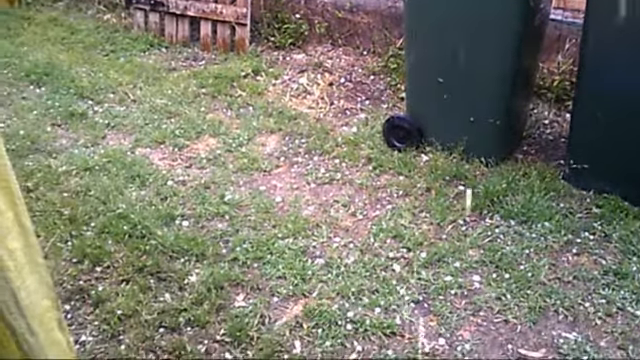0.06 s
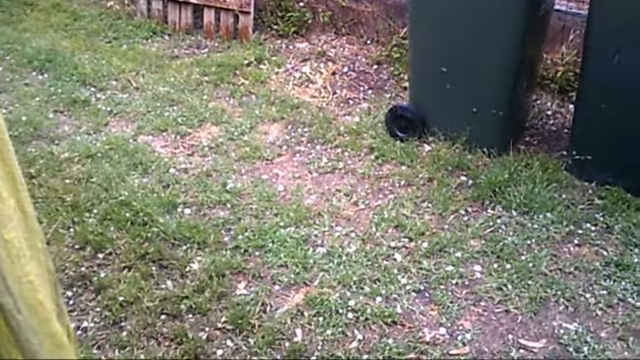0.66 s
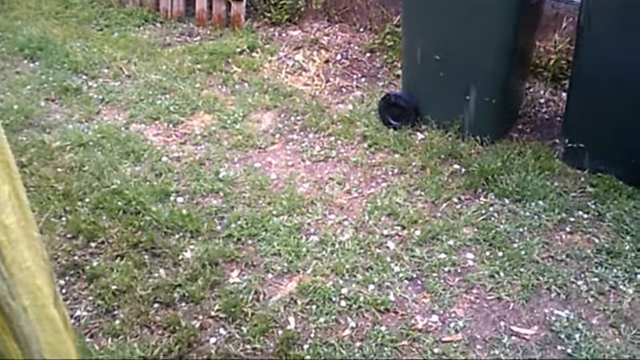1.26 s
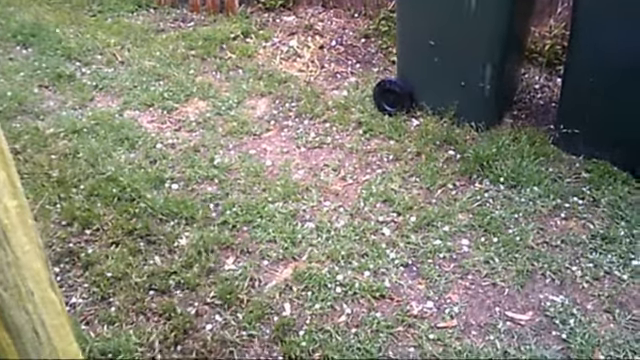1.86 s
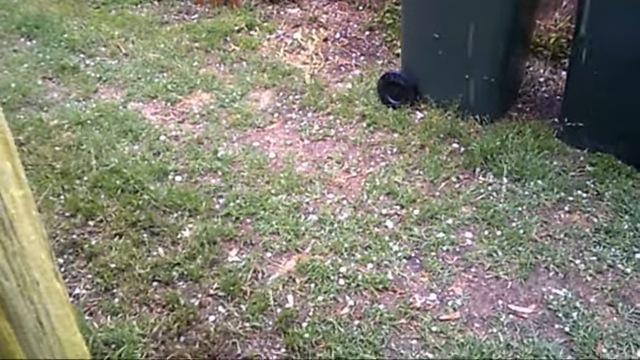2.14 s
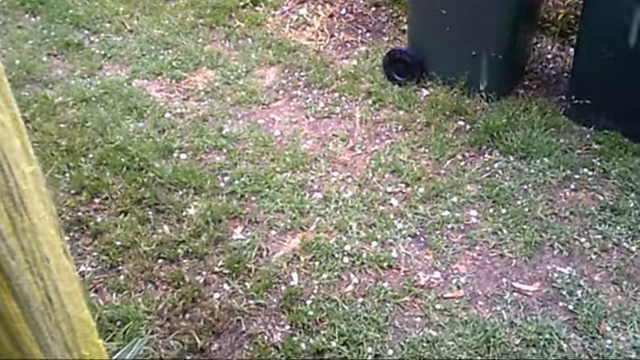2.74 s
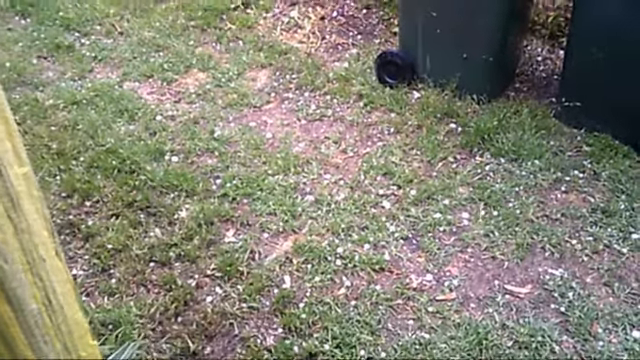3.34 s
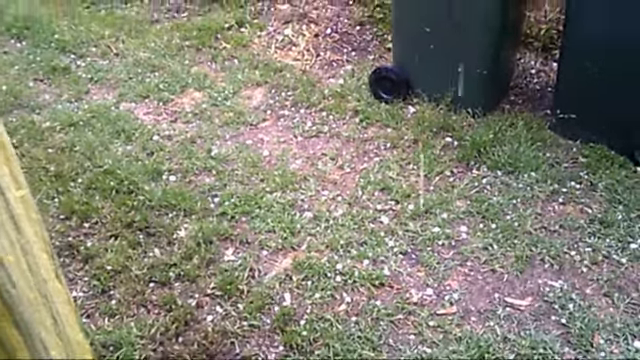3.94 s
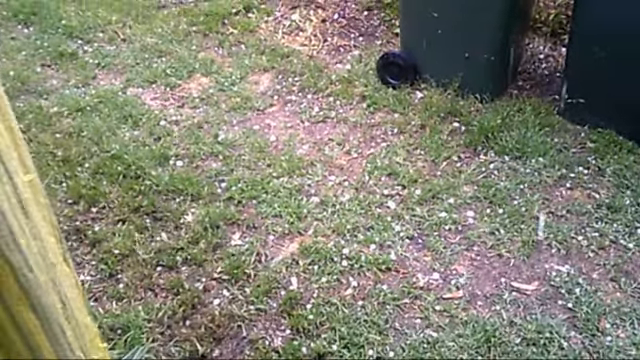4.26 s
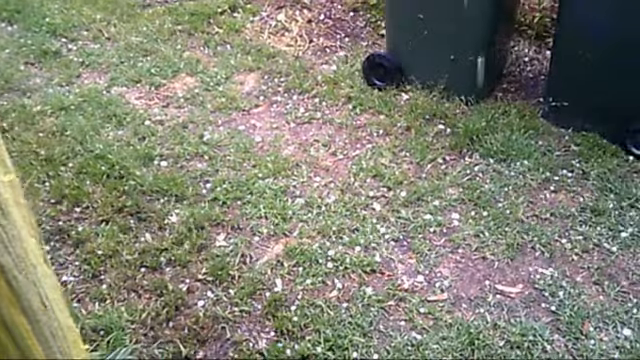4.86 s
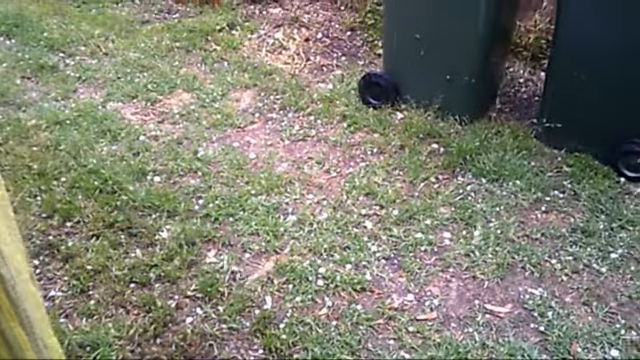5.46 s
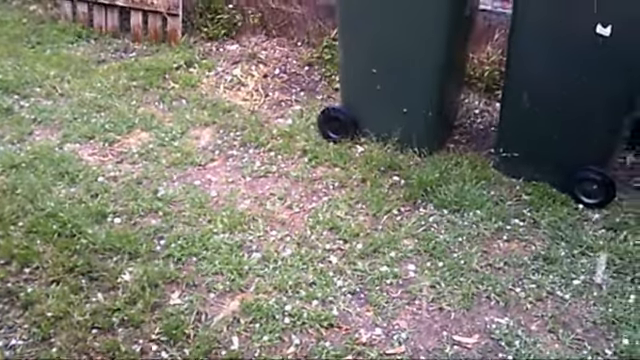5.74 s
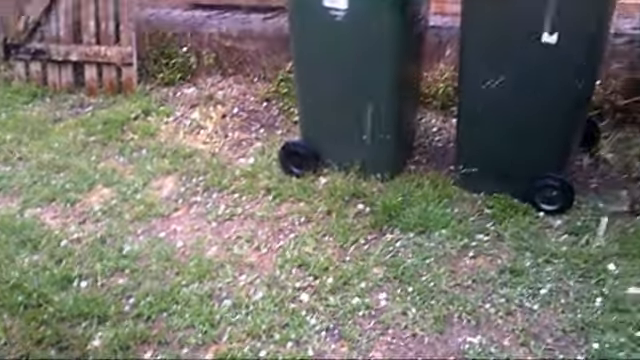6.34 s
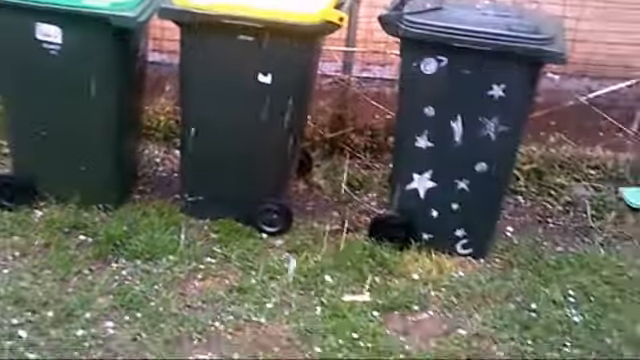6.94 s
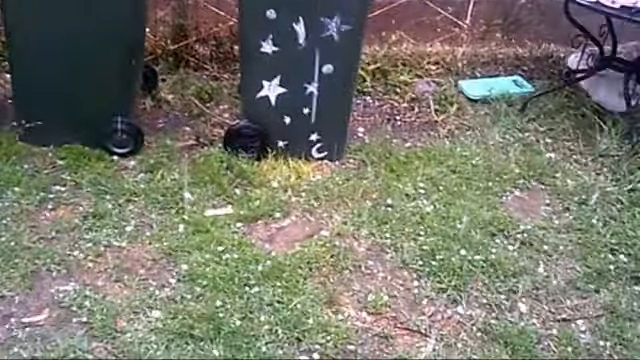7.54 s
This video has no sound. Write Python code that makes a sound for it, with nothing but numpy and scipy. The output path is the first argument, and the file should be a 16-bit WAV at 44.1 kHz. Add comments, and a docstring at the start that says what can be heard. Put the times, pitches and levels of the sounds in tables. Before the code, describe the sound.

From shelter at the edge of a back yard, countless small hailstones merge into a continuous clatter on the sheet roof overhead. Larger ones strike irregularly with hollow, booming knocks, and two hard ones land together at the end. Occasional short pings and dull bumps mix in, with faint ticks of ice on grass and bins and a low wind rumble. There is little treble.

```python
"""A dense patter of hail on a sheet roof over a back yard, heard from under its edge.
Hundreds of small impacts a second excite the bending modes of the sheets and merge, while ice ticks on
the lawn and the bins. Now and then a big stone knocks: a crack, then a boom and a rumble of the frame.
A few stones ping on something resonant, and there are some dull bumps. A low rumble of air lies under
it all, and little treble is kept."""
import sys
import numpy as np
from scipy import signal
from scipy.fft import rfft, irfft
from scipy.io import wavfile
from scipy.ndimage import uniform_filter1d, minimum_filter1d

SR = 44100
rng = np.random.default_rng(int(sys.argv[2]) if len(sys.argv) > 2 else 0)


def transcribe(u):
    """Save the signal u as a 16-bit wav file named by the first command-line argument.

    u: samples, shape (n,) or (channels, n), limited to [-1, 1]; the rate is SR.
    q: integer samples, one column per channel.
    """
    v = np.clip(np.atleast_2d(u).T, -1, 1)
    q = np.round(v * 32767).astype(np.int16)
    wavfile.write(sys.argv[1], SR, q)


N = 335160

# spectrum of big and middling stones on the roof: (frequency [Hz], relative spectral level [dB])
KNOCK_SPECTRUM = [(50, -17.5), (110, -3), (190, 1), (330, -0.5), (700, 0.5), (1100, 2), (1500, -3.5),
                  (2000, -1), (2600, -8.5), (3300, -14.5), (4300, -34.5), (5500, -43.5), (7200, -38),
                  (9000, -49.5)]


def undb(db):
    """Amplitude ratio of a level in decibels."""
    return 10 ** (np.asarray(db) / 20)


def level(x, db):
    """Normalisation to an rms level."""
    return x * undb(db) / np.sqrt(np.mean(x ** 2))


def read(table, hz):
    """Interpolation of a (frequency [Hz], value) table on a logarithmic frequency axis."""
    f, value = np.transpose(table)
    return np.interp(np.log(hz + 1), np.log(f), value)


def response(table, size, resonances=()):
    """Minimum-phase filter of mean power 1: the given spectrum with a peak at each resonance."""
    hz = np.arange(size // 2 + 1) * SR / size
    peaks_db = sum(lift / (1 + (2 * (hz - f) / width) ** 2) for f, width, lift in resonances)
    magnitude = level(undb(read(table, hz) + peaks_db), 0)
    cepstrum = irfft(np.log(magnitude), size)[:size // 2]
    return np.exp(2 * rfft(cepstrum, size) - cepstrum[0])


def coloured(table, size):
    """White noise filtered to the given spectrum, with rms near 1."""
    return irfft(rfft(rng.standard_normal(size)) * response(table, size), size)


def add(out, s, x):
    """Superposition of x on out from time s on."""
    i = max(int(s * SR), 0)
    out[i:i + len(x)] += x[:max(len(out) - i, 0)]


def arrivals(per_s, spread_db, top_db):
    """Poisson process of impacts, with log-normal strengths up to a largest one."""
    size_db = spread_db * rng.standard_normal(N)
    return (rng.random(N) < per_s / SR) * undb(np.minimum(size_db, top_db))


def shower():
    """Slow amplitude modulation: the hail eases off and picks up again."""
    # strength of the shower: (time [s], relative level [dB])
    strength = [(0.0, -21), (0.8, -25.5), (3.6, -26), (4.55, -23), (5.2, -24.5), (6.55, -23.5), (6.8, -25),
                (7.1, -22.5), (7.6, -24.5)]
    s, db = np.transpose(strength)
    return np.interp(np.arange(N) / SR, s, undb(db))


def roof(spectrum, bloom_s, flex_hz=380, body_hz=600, hard_hz=2800, size=24576):
    """Plate vibration: crowded modes act as noise bands, each with its own decay. Returns strike()."""
    # resonances of the sheets: (frequency [Hz], width [Hz], lift [dB])
    resonances = [(123, 28, 2.5), (165, 22, 2), (396.5, 9.7, 4), (542, 86, 1.5), (612, 8.5, 6.5),
                  (850, 52, 1), (1023, 58, 3), (1144, 70, 2), (1666, 28, 6), (1816, 100, 3)]
    # ring of the roof before a blow scales it: (frequency [Hz], 60 dB decay time [s])
    ring_times = [(60, 0.43), (170, 0.9), (420, 0.46), (1100, 0.3), (2000, 0.32), (3500, 0.2), (7500, 0.19)]
    t, hz = np.arange(size) / SR, np.arange(size // 2 + 1) * SR / size
    centres = np.geomspace(60, 7680, 12)
    bands = np.array([read(np.c_[centres, pick], hz) for pick in np.eye(len(centres))])
    f, sheet = centres[:, None], response(spectrum, size, resonances)
    low, high = 1 / (1 + (f / flex_hz) ** 3), 1 / (1 + (hard_hz / f) ** 4)
    middle = np.exp(-np.log2(f / body_hz) ** 2)
    # slow bending waves need time to spread over the sheet, so the boom comes late
    swell = 1 - np.exp(-t / (0.00023 + bloom_s * low))
    attack = swell * (1 + .5 * np.exp(-t / 0.001))  # the direct crack stands above the first ring
    log_decay = -np.log(1000) * t / read(ring_times, f)

    def strike(ring_scale, boom_db, body_db, hard_db):
        """Impulse response: one blow, with its own ring length, low boom, hollow body and hard treble."""
        phases = np.exp(2j * np.pi * rng.random(len(hz)))
        modes = irfft(bands * phases, size) * np.sqrt(size)
        gain = undb(boom_db * low + body_db * middle + hard_db * high)
        envelope = attack * np.exp(log_decay / max(ring_scale, .1))
        return irfft(rfft((gain * modes * envelope).sum(0)) * sheet, size)
    return strike


def patter(spots=14):
    """Linear superposition: small stones all over the roof, each spot with its own impulse response."""
    # spectrum of small stones on the roof: (frequency [Hz], relative spectral level [dB])
    patter_spectrum = [(40, -29), (70, -9.5), (120, 2), (200, 0.5), (330, -1), (450, -3.5), (700, -7),
                       (1000, 0), (1400, -4), (2000, -6.5), (2600, -13.5), (3400, -23), (4500, -49.5),
                       (7000, -48), (9000, -61)]
    out, force, strike = 0, shower(), roof(patter_spectrum, bloom_s=0.003)
    for boom, hard in rng.standard_normal((spots, 2)):
        spot = strike(ring_scale=0.56, boom_db=1.3 * boom, body_db=3, hard_db=2 * hard)
        stones = force * arrivals(per_s=360 / spots, spread_db=3.0, top_db=8.5)
        out = out + signal.oaconvolve(stones, spot)[:N]
    return level(out, db=-23)


def air():
    """Stationary noise: wind and far hail merge into a low rumble."""
    # spectrum of wind and far hail: (frequency [Hz], relative spectral level [dB])
    air_spectrum = [(20, -11), (36, -1), (55, -7.5), (85, -2), (150, -3), (400, -11.5), (1000, -9.5),
                    (2200, -14), (4500, -65), (7000, -58), (9000, -62.5), (15000, -48)]
    return level(coloured(air_spectrum, N), db=-30)


def ticks(spots=10, median_flight_s=0.055, rebound_db=-3.5, size=2048):
    """Inelastic impact: ice lands on lawn, path and bins in a splash of crumbs and rebounds once."""
    # spectrum of ice on the ground: (frequency [Hz], relative spectral level [dB])
    tick_spectrum = [(200, -4.5), (1000, 11.5), (2200, -7), (3300, -12), (4600, -29.5), (7000, -22.5),
                     (9000, -35)]
    out, t = 0, np.arange(size) / SR
    for spread, spring in rng.standard_normal((spots, 2)):
        decay_s = 0.003 * np.exp(.5 * spread)
        crumbs = rng.standard_normal(size) * np.exp(-t / decay_s)
        splash = irfft(rfft(crumbs) * response(tick_spectrum, size), size)
        stones = shower() * arrivals(per_s=65 / spots, spread_db=6.5, top_db=11)
        add(stones, median_flight_s * np.exp(.5 * spring), undb(rebound_db) * stones)
        out = out + signal.oaconvolve(stones, splash)[:N]
    return level(out, db=-45.5)


def knocks(ring_doubling_db=45.5, frame_db=-23.5, frame_rise_s=0.057, size=24576):
    """Impulsive excitation: a big stone cracks at the contact, the sheet rings, the frame rumbles on."""
    # big stones on the roof: (time [s], strength [dB], boom [dB], hardness [dB])
    big_stones = [(0.053, -14, -9.5, -11), (0.074, -11.5, -33, -15), (0.239, -14.5, -12, -9),
                  (0.341, -22, -14, -2), (0.542, -20, -5, -12), (0.759, -12, -10, 0.5),
                  (0.923, -10, -4, -9.5), (1.09, -7, 2.5, -7.5), (1.263, -14.5, -3, -1),
                  (1.282, -15, -6, -3), (1.563, -13, -10, -12.5), (1.969, -27, -4, 5),
                  (2.134, -16.5, 3.5, -13), (2.311, -17, 0, -16), (2.527, -17.5, -2, -16),
                  (2.906, -20, -1, -10), (3.096, -18, -9, -8), (3.447, -19.5, 3, -9), (3.673, -15, -4, -21),
                  (3.819, -18, 4, -6), (3.918, -15.5, -8, -17), (4.116, -16, 0.5, -2),
                  (4.148, -14.5, -0.5, -4.5), (4.346, -15, 1, -15), (4.414, -14.5, -3, -20),
                  (4.547, -15, -3, -8), (4.656, -2.5, 3.5, -7.5), (4.981, -10, -4.5, -1.5),
                  (5.15, -15, -5, -7), (5.302, -22, 5, -2), (5.387, -16.5, -8, -11), (5.655, -16.5, 5, -12),
                  (5.845, -16.5, 5, -8), (6.08, -16.5, 1, -12), (6.241, -14, 2.5, -5),
                  (6.264, -16.5, -17, -7), (6.484, -14.5, -3, -5.5), (6.641, -16, -21, -8),
                  (6.966, -15.5, 4, -13), (7.064, -19.5, -5, 1), (7.44, -5, 0.5, -3), (7.495, -5, 1, -10.5)]
    # spectrum of the frame under the sheets: (frequency [Hz], relative spectral level [dB])
    frame_spectrum = [(15, -11), (35, -1.5), (75, -2), (150, -7), (260, -2), (600, -43.5), (3000, -100)]
    out, t = np.zeros(N), np.arange(size) / SR
    strike = roof(KNOCK_SPECTRUM, bloom_s=0.0086)
    shake = (1 - np.exp(-t / frame_rise_s)) * (1 - t / t[-1]) ** 1.2
    for s, db, boom_db, hard_db in big_stones:
        # a heavier stone sets more of the sheet ringing, and for longer
        body_db = 1.5 + 0.49 * db
        ring_scale = 2 ** (db / ring_doubling_db)
        add(out, s, strike(ring_scale, boom_db, body_db, hard_db) * undb(db))
        add(out, s, coloured(frame_spectrum, size) * shake * undb(frame_db + db + boom_db))
    return out


def strays(count=20, strength_db=-22.5, spread_db=2.5):
    """Middling stones at scattered times: each point of impact excites a different mix of modes."""
    out, strike = np.zeros(N), roof(KNOCK_SPECTRUM, bloom_s=0.011)
    times = (np.arange(count) + rng.random(count)) / count * N / SR
    for s, (weight, boom, hard) in zip(times, rng.uniform(-1, 1, (count, 3))):
        blow = strike(ring_scale=0.53, boom_db=-4 + 5 * boom, body_db=0.5, hard_db=-3 + 5 * hard)
        add(out, s, blow * undb(strength_db + spread_db * weight))
    return out


def pings(rise_s=0.003):
    """Free vibration: one lightly damped mode decays exponentially after the blow."""
    # stones on something resonant: (time [s], frequency [Hz], level [dB], 60 dB decay time [s])
    ringing_hits = [(0.926, 1640, -15, 0.17), (1.091, 785, -16, 0.29), (1.565, 1860, -23, 0.39),
                    (4.412, 920, -27, 0.053), (4.432, 1028, -15, 0.12), (4.982, 1760, -24, 0.21),
                    (6.184, 2550, -33, 0.18), (6.243, 1696, -16, 0.15), (7.165, 1480, -22, 0.61)]
    out, t = np.zeros(N), np.arange(SR // 2) / SR
    for s, hz, db, t60 in ringing_hits:
        envelope = undb(db - 60 * t / t60) * (1 - np.exp(-t / rise_s))
        add(out, s, envelope * np.sin(2 * np.pi * hz * t))
    return out


def bumps():
    """Gaussian wave packets: a low tone of a few cycles at most is heard as a dull bump."""
    # low bumps: (centre time [s], frequency [Hz], peak level [dB], half-width at 1/e [s])
    packets = [(3.146, 164, -10, 0.0031), (4.555, 129, -14.5, 0.021), (5.307, 147, -14, 0.0059),
               (6.107, 86.5, -18, 0.022)]
    out, t = np.zeros(N), np.arange(N) / SR
    for s, hz, db, half_width in packets:
        envelope = undb(db) * np.exp(-((t - s) / half_width) ** 2)
        out += envelope * np.cos(2 * np.pi * hz * (t - s))
    return out


def scene():
    """Sound pressures from roof, ground and air add at one listening point."""
    return (patter() + air() + ticks() + knocks() + strays() + pings() + bumps())[None]


def record(dry, ceiling=1.3, headroom=1.47, window=221, treble_hz=7500, top_hz=15700):
    """Fast limiting and soft saturation round the biggest knocks; low-pass filters keep little treble."""
    gain = minimum_filter1d(ceiling / np.maximum(abs(dry), ceiling), window)
    smooth_gain = uniform_filter1d(uniform_filter1d(gain, window // 2), window // 2)
    rounded = headroom * np.tanh(dry * smooth_gain / headroom)
    dulled = signal.sosfilt(signal.ellip(4, .3, 27, treble_hz, fs=SR, output="sos"), rounded)
    return signal.sosfilt(signal.ellip(8, .2, 70, top_hz, fs=SR, output="sos"), dulled)


dry = scene()
out = record(dry)
transcribe(out)
```